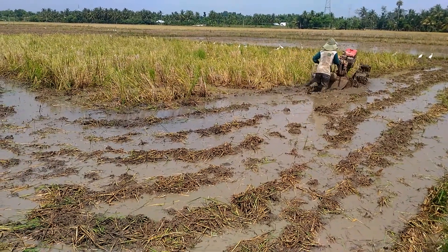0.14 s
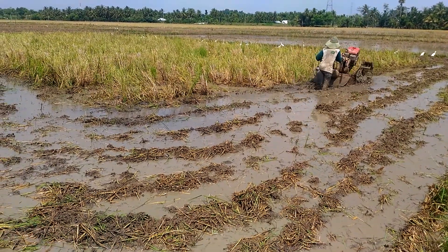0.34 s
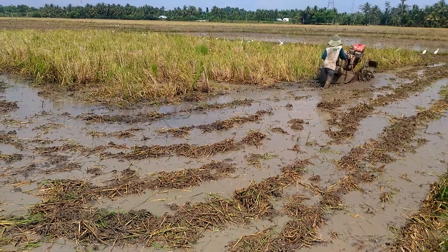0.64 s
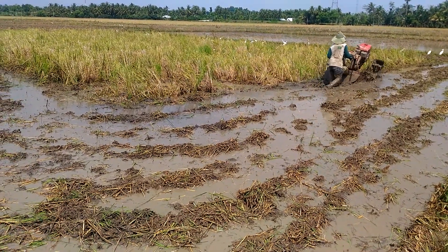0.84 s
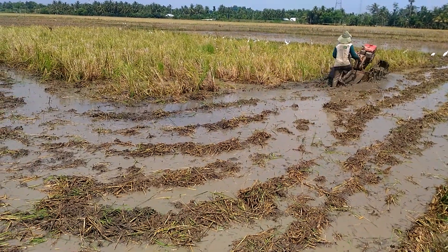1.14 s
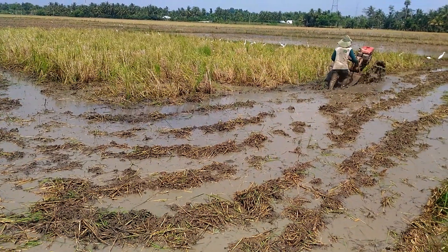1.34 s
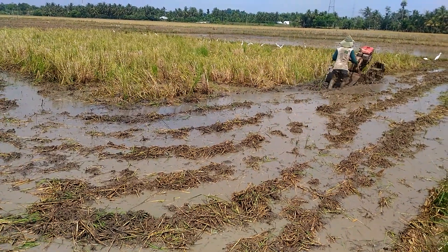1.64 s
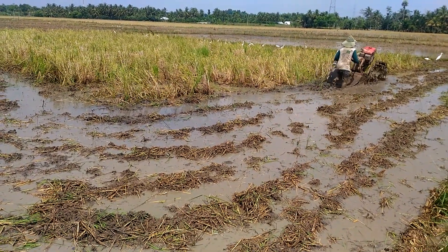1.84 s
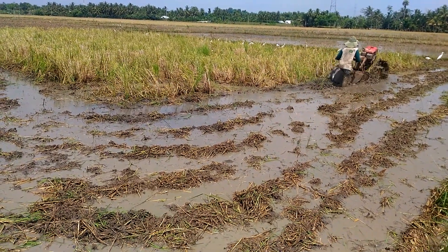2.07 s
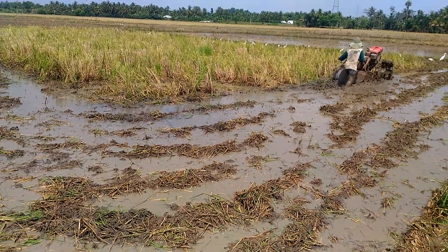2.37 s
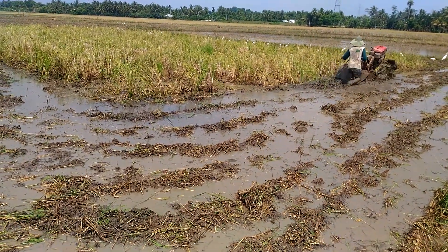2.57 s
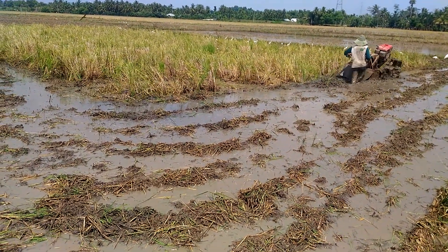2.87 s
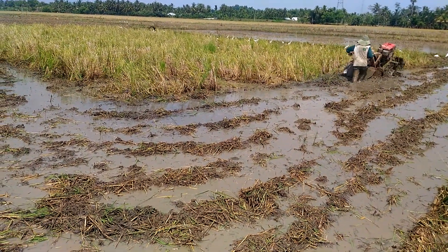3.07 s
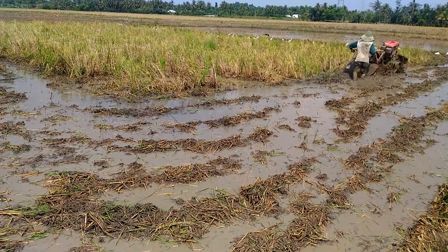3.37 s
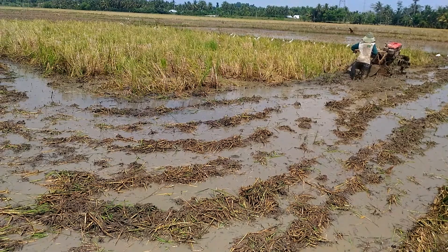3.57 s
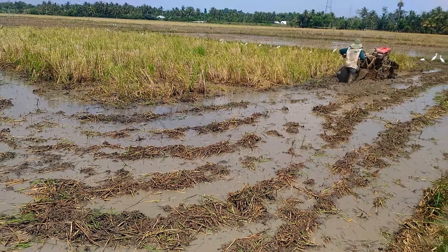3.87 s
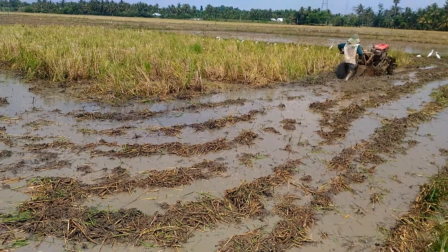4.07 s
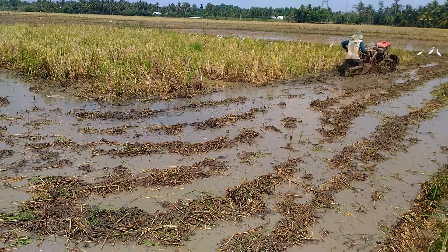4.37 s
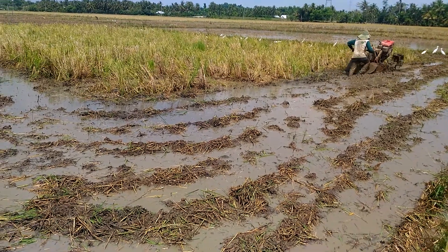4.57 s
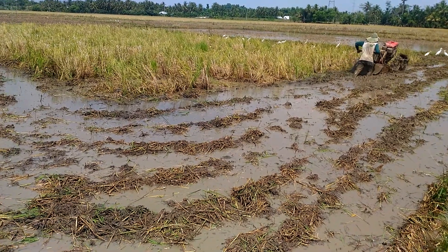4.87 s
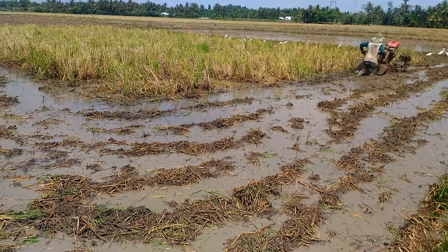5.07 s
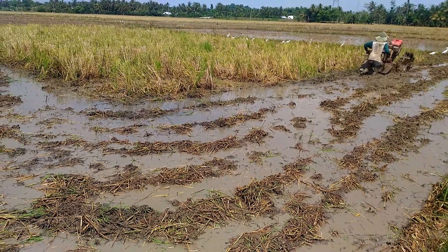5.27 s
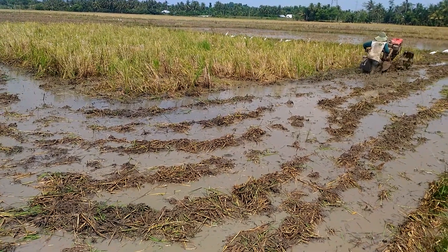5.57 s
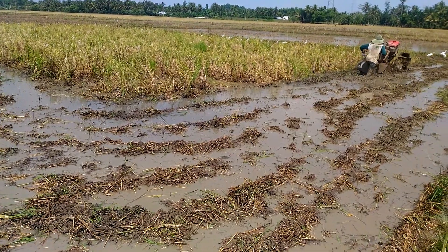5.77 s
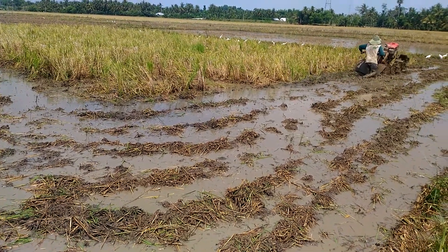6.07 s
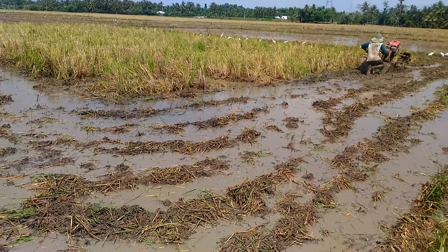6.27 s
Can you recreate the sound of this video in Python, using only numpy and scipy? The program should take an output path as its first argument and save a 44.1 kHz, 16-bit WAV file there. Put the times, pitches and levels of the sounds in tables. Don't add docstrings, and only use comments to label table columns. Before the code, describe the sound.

A two-wheel diesel tractor works some way off in an open flooded field. Its exhaust throbs in a fast, steady putter of about twenty-one beats a second, with dry knocking, valve ticking, casing rattle and a thin gear whine that dips at times. The pace hardly changes and the clatter fades slightly. Low wind buffeting grows from the middle onward on a handheld stereo microphone.

```python
import sys
import numpy as np
from scipy import signal
from scipy.fft import rfft, irfft, next_fast_len
from scipy.io import wavfile
from scipy.ndimage import uniform_filter1d, map_coordinates

SR = 44100
rng = np.random.default_rng(int(sys.argv[2]) if len(sys.argv) > 2 else 0)


def field_ratio(decibels):
    return 10 ** (np.asarray(decibels, dtype=float) / 20)


def to_wav(sig):
    pcm = np.clip(np.atleast_2d(sig), -1, 1) * 32767
    pcm = np.round(pcm).astype(np.int16)
    wavfile.write(sys.argv[1], SR, pcm.T)


N = 283122


def unit(x):
    return x / np.sqrt(np.mean(x ** 2) + 1e-20)


def along(points, hz):
    f, *columns = np.transpose(points)
    return np.array([np.interp(np.log(hz + 1), np.log(f + 1), c) for c in columns])


def curves(rows):
    s, *columns = np.transpose(rows)
    return [np.interp(np.arange(N) / SR, s, c) for c in columns]


def swells(rows):
    s, half = np.transpose(rows)[:2, :, None]
    return np.exp(-((np.arange(N) / SR - s) / half) ** 2)


def wobble(rate):
    knots = rng.standard_normal(int(N * rate / SR) + 4)
    return map_coordinates(knots, [np.arange(N) * rate / SR])


def filtered(x, response):
    m = next_fast_len(N + SR // 2)
    return irfft(rfft(x, m) * response(np.fft.rfftfreq(m, 1 / SR)), m)[..., :N]


# f/Hz, likeness (0-1), lead of the right port/radians
PORT_PAIR = [(29.2, 1, -0.5), (694, 0.96, 0.43), (1480, 0.96, 1.66), (2200, 0.55, 2.5), (2720, .3, 2.5),
             (2860, .96, 2.97), (3550, .94, 3.55), (3780, .8, 3.7), (3680, 0.52, 4), (5230, 0.87, 3),
             (5830, 0, 8.5), (6340, 0.9, 7.5), (7750, 0, 8), (14000, 0, 11)]


def at_ports(x):
    return filtered(x, lambda hz: np.exp(.5j * along(PORT_PAIR, hz)[1] * [[-1], [1]]))


def puffs(gate, spectrum):
    m = next_fast_len(N + 8192)
    hz = np.fft.rfftfreq(m, 1 / SR)
    alike, lead = along(PORT_PAIR, hz)
    alike = np.clip(alike, 0, 1)
    noise = rfft(gate * rng.standard_normal((3, N)), m)
    shared = np.sqrt(alike) * noise[0] * np.exp(.5j * lead * [[-1], [1]])
    scattered = np.sqrt(1 - alike) * noise[1:]
    both = irfft((shared + scattered) * field_ratio(along(spectrum, hz)), m)[:, :N]
    return both / np.std(both.mean(0))


def burst(turns, at, rise, fall, scatter_db, late, tail=0.):
    cycle = np.floor(turns - at + .1).astype(int) + 1
    chance = rng.standard_normal((int(turns[-1]) + 3, 2))[cycle]
    since = (turns - at + 0.087) % 1 - .1 - late * chance[:, 1]
    since = np.clip(since, 0, None)
    decay = np.exp(-since / fall) + tail * np.exp(-(since / 0.22) ** 3)
    shape = (1 - np.exp(-(since / rise) ** 2)) * decay
    return field_ratio(scatter_db * chance[:, 0]) * shape / shape.max()


# t/s, firings per second
FIRING_RATE = [(0.0, 20.813), (0.96, 20.841), (1.28, 20.997), (1.77, 20.959), (1.93, 21.102),
               (2.41, 20.884), (2.89, 21.073), (3.53, 20.927), (4.01, 20.928), (4.33, 20.836),
               (4.65, 21.086), (4.98, 20.871), (5.14, 21.066), (6.42, 20.916)]


def engine_turns():
    start = .05
    return start + np.cumsum(curves(FIRING_RATE)[0]) / SR


STROKE_MOMENTS = [
    .734,
    .497,
    .243,
]
# f/Hz, width/Hz, signed push by exhaust, by firing, by intake
RESONANCES = [(60, 44, 4.7, -8.5, -.8), (94, 99, -7.9, 10.3, 2.3), (162, 13, 53.7, -5.4, 11.8),
              (200, 6, 89, 14.9, -52), (249, 12, -32, -15.8, 15.7), (315, 6, -55.5, -72, 11.3),
              (336, 17, -6.4, 15.5, -12.2), (530, 34, -1.1, .3, -.6), (674, 76, 2, -1.7, -2.1)]
# multiple of the firing rate, level/dB
ORDERS = [(1, -46), (2, -29.5), (3, -22.5), (4, -22), (5, -14), (6, -12), (7, -11.0), (8, -4.5), (9, -9),
          (10, -10.5), (11, -9.5), (12, -9.5), (13, -41), (14, -20.5), (15, -10.0), (16, -23.5),
          (17, -29.6), (18, -25.5), (19, -22.5), (20, -31.5), (21, -53), (22, -35), (23, -29), (24, -27.5),
          (25, -38), (26, -38), (27, -27), (28, -29.5), (29, -26), (30, -37), (31, -21.5), (32, -23),
          (33, -38), (34, -37), (35, -34), (36, -27)]


def exhaust(turns, level_db):
    k, order_db = np.transpose(ORDERS)
    f = k * np.mean(np.transpose(FIRING_RATE)[1])
    rings = np.array([1j * f * r[1] / (r[0] ** 2 - f * f + 1j * f * r[1]) for r in RESONANCES])
    delays = np.exp(-2j * np.pi * np.outer(STROKE_MOMENTS, k))
    steps = np.array(RESONANCES)[:, 2:].T @ rings * delays
    steps *= field_ratio(order_db) / np.abs(steps.sum(0))
    cycles = irfft(np.pad(steps, ((0, 0), (1, 988))), axis=1)
    around = np.arange(cycles.shape[1]) / cycles.shape[1]
    turns = turns + 0.0005 * wobble(12)
    out = sum(field_ratio(0.64 * wobble(14)) * np.interp(turns, around, c, period=1) for c in cycles)
    return at_ports(field_ratio(level_db + 0.76) * unit(out)) * field_ratio([[.3], [-.3]])


# t/s, peak level/dB
HARSH_FIRINGS = [(0.0228, -19), (0.311, -13), (0.4559, -29), (0.7911, -19), (.826, -25), (0.8866, -13),
                 (1.077, -14), (1.1263, -11), (2.591, -19), (3.1742, -21), (3.2695, -19), (3.412, -27),
                 (4.0687, -22), (4.4654, -14), (4.5476, -22), (4.596, -23), (4.99, -12)]


def diesel_knock(turns):
    knock = burst(turns, at=.5, rise=.065, fall=.05, scatter_db=2.2, late=.012, tail=.09)
    for s, db in HARSH_FIRINGS:
        crack = knock[round(s * SR):][:SR // 100]
        crack += field_ratio(db + 21.0) * np.exp(-np.arange(len(crack)) / (0.004 * SR))
    return knock


def wall_thud(turns):
    return burst(turns, at=.47, rise=.1, fall=.07, scatter_db=1.5, late=.012, tail=.06)


def valve_tick(turns, fall):
    return burst(turns, at=.235, rise=.035, fall=fall, scatter_db=2.5, late=.01)


def grit(db):
    return field_ratio(db * wobble(250))


# f/Hz, left level/dB, right level/dB
PING_SPECTRUM = [(4500, -45, -55), (5520, -10, -33), (6070, -2, -5), (6430, -1.5, -1), (7280, -9.5, 0),
                 (8500, -18.5, 0), (10170, -21.5, -2), (11550, -28, -10), (13000, -24, -14.5),
                 (14300, -28, -21)]
# t/s, level/dB
TICK_LEVEL = [
    (0, 0),
    (2.4, -8.5),
    (2.5, 3),
    (3, 1),
    (3.6, -4),
    (4.65, 5.5),
    (4.8, -8),
    (5.1, -1),
    (5.3, -21),
    (6.42, -3),
]


def ping(turns, knock):
    ticks = 0.46 * field_ratio(curves(TICK_LEVEL)[0]) * valve_tick(turns, 0.36)
    return puffs(grit(1.8) * (knock + ticks + 0.44), PING_SPECTRUM)


# f/Hz, left level/dB, right level/dB
HISS_SPECTRUM = [(2500, -50, -50), (3300, -12, -12.5), (3540, 0, -.5), (3950, -8, -2), (4150, -7, -1.5),
                 (4500, -11.5, -1), (4950, -7, -3), (5420, -11, -11), (5800, -14, -26), (7000, -60, -60)]


def hiss(turns, knock, thud):
    uneven_knock = 0.35 * field_ratio(1.6 * wobble(30)) * knock
    gate = uneven_knock + 0.28 * thud + 0.13 * valve_tick(turns, 0.36) + .5
    return puffs(grit(2.2) * gate, HISS_SPECTRUM)


# f/Hz, left level/dB, right level/dB
BLOCK_SPECTRUM = [(600, -30, -30), (1080, -5, -6), (1400, -1, -2), (1500, -2, -5), (1780, 0, 0),
                  (2000, -5, -1), (2120, -1, -1), (2230, -3, -5), (2470, -6, 2.5), (2780, -3, -6),
                  (3000, .3, -.2), (3300, -8, -8), (3700, -25, -25), (5000, -70, -70)]


def block(turns, knock, thud):
    gate = 0.14 * knock + 0.66 * thud + 0.46 * valve_tick(turns, 0.19) + 0.66
    return puffs(grit(1.28) * gate, BLOCK_SPECTRUM)


# f/Hz, level/dB per Hz
CASING_SPECTRUM = [(60, -7), (150, 2.5), (330, -5), (450, -14), (650, -3.5), (800, -3.5), (1000, -10.5),
                   (1400, -52), (3000, -70)]


def casing(turns, knock):
    blow = burst(turns, at=.74, rise=.03, fall=.05, scatter_db=1.5, late=.005)
    return puffs(0.5 * blow + 0.5 * valve_tick(turns, 0.17) + 0.11 * knock + 0.63, CASING_SPECTRUM)


def clatter(turns, block_db, knock_db):
    knock, thud = diesel_knock(turns), wall_thud(turns)
    top = field_ratio(knock_db - 0.5) * ping(turns, knock)
    spray = field_ratio(knock_db - 3.5) * hiss(turns, knock, thud)
    body = field_ratio(block_db) * block(turns, knock, thud)
    return top + spray + body + field_ratio(-34.0) * casing(turns, knock)


# t/s, half length/s, drop in level/dB
SLACK_DRIVE = [
    (0.253, 0.067, 8),
    (0.803, 0.14, 3),
    (2.255, 0.13, 5),
    (2.85, 0.11, 7),
    (3.15, 0.2, 11),
    (3.748, 0.093, 11),
    (4.2, .06, 0),
    (4.5, 0.16, 10),
    (4.997, .08, 4),
]


def gear(turns, level_db):
    mesh = 39.545
    drop_db = np.transpose(SLACK_DRIVE)[2] @ swells(SLACK_DRIVE)
    level = field_ratio(level_db - drop_db + 1.2 * wobble(20))
    tone = np.sin(2 * np.pi * mesh * turns + 0.25 * wobble(12))
    return at_ports(np.sqrt(2) * level * tone)


DRAWING_AWAY = [
    0.026,
    0.44,
    0.031,
    0.91,
]
# t/s, level/dB
FUEL_BITE = [(0, -0.5), (1.2, 0), (1.4, -1.5), (1.8, -0.5), (2, -4), (2.3, -3), (2.6, 0.5), (3.1, -2.5),
             (3.4, 0.1), (4.2, -0.5), (4.6, 1.9), (4.85, -4), (5.1, 0), (5.45, -2), (5.62, -5),
             (5.75, -1.5), (6.05, -3), (6.42, -3.5)]
# t/s, extra lead of the right port/samples, its shading level/dB
DIRECTION = [(0, -1.2, -2.5), (.35, -.7, 0), (.75, -1, 0), (.9, -.4, -3), (2.1, -.4, -2.8), (2.3, -.3, -.3),
             (2.9, -.2, -1), (3.1, 0, .3), (3.8, 0, .3), (4, -.5, 0), (4.3, -.4, -2.8), (4.95, -.3, -2),
             (5.1, .2, .3), (6.42, .3, 0)]


def tractor():
    turns = engine_turns()
    start_db = np.array([[-23.5, -35.5, -34, -39]]).T
    fade_db = np.outer(DRAWING_AWAY, np.arange(N) / SR)
    exhaust_db, block_db, knock_db, gear_db = start_db - fade_db
    bite_db, = curves(FUEL_BITE)
    lead, shade_db = curves(DIRECTION)
    block_db = block_db + 0.19 * bite_db + 0.74 * wobble(5.01)
    rattle = clatter(turns, block_db, knock_db + bite_db)
    rattle = rattle * field_ratio([-shade_db / 2, shade_db / 2])
    out = exhaust(turns, exhaust_db + 0.33 * wobble(4.74)) + rattle + gear(turns, gear_db)
    tremor = .17 * wobble(11)
    out[1] = map_coordinates(out[1], [np.arange(N) + lead + tremor], order=4, mode="nearest")
    return out


# t/s, level/dB
BREEZE_LEVEL = [
    (0, -70),
    (1.5, -52),
    (2.3, -44.5),
    (2.7, -36.5),
    (5.1, -32.5),
    (5.35, -41),
    (5.6, -34.5),
    (6.42, -32.5),
]
# t/s, half length/s, peak level/dB
GUST_EVENTS = [(1.1, .05, -40), (1.622, .05, -43), (1.88, .07, -47), (2.2, .05, -44), (2.513, 0.069, -36),
               (2.72, 0.051, -32), (2.903, 0.089, -27), (3.1, .05, -34), (3.375, 0.12, -32),
               (3.625, 0.037, -38), (4.13, 0.075, -35), (4.428, 0.065, -26.5), (4.6, 0.077, -32),
               (4.77, 0.13, -27), (5.02, 0.084, -34), (5.22, 0.039, -33), (5.65, 0.11, -37),
               (5.914, 0.11, -31.5), (6.4, .12, -30.5)]
# f/Hz, level/dB per Hz
BUFFET_SPECTRUM = [(20, -38), (45, -8.5), (70, -3), (130, -2), (220, -2.5), (330, -10), (500, -18.5),
                   (800, -23), (1500, -64)]


def wind():
    own = rng.standard_normal((2, N))
    eddies = filtered(rng.standard_normal(N), lambda hz: 2.5 / (1 + (hz / 75) ** 2))
    air = own + 0.32 * eddies
    lumps = field_ratio(3.2 * np.array([wobble(28), wobble(28)]))
    gusts = field_ratio(np.transpose(GUST_EVENTS)[2]) @ swells(GUST_EVENTS)
    strength = field_ratio(curves(BREEZE_LEVEL)[0]) + gusts
    return strength * unit(lumps * filtered(air, lambda hz: field_ratio(along(BUFFET_SPECTRUM, hz))))


def scene():
    return tractor() + wind()


def gain_control(x):
    aim_db, share, memory_s = -23.5, 0.72, 0.0517
    power = np.abs(uniform_filter1d(np.mean(x ** 2, 0), int(memory_s * SR)))
    return x * np.clip(power / field_ratio(2 * aim_db), 1, None) ** (-share / 2)


def roll_off(x):
    return signal.sosfilt(signal.butter(12, 14690, fs=SR, output="sos"), x)


def record(dry):
    mix = filtered(gain_control(dry), lambda hz: hz < 14300)
    return roll_off(mix)


dry = scene()
out = record(dry)
to_wav(out)
```